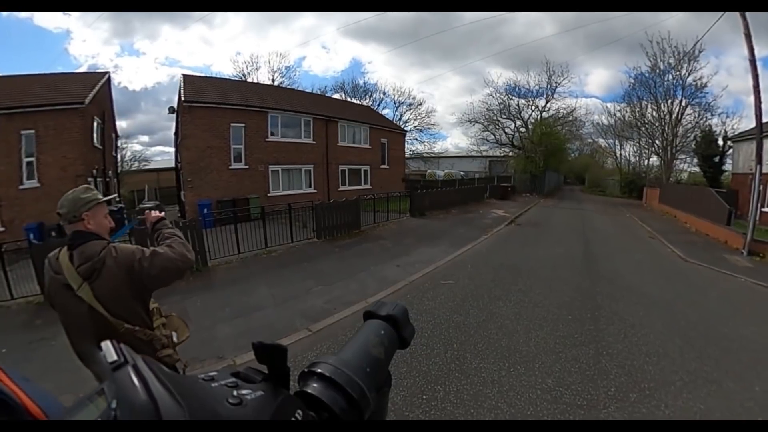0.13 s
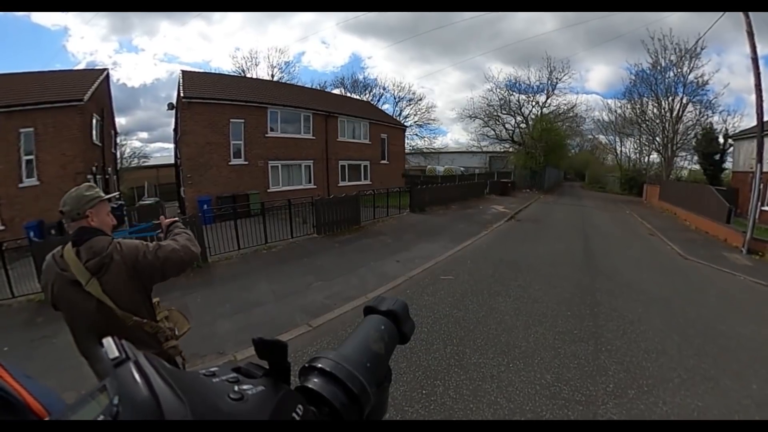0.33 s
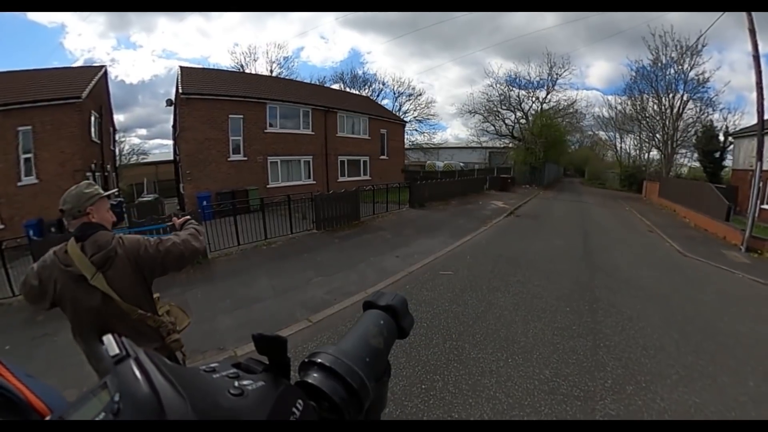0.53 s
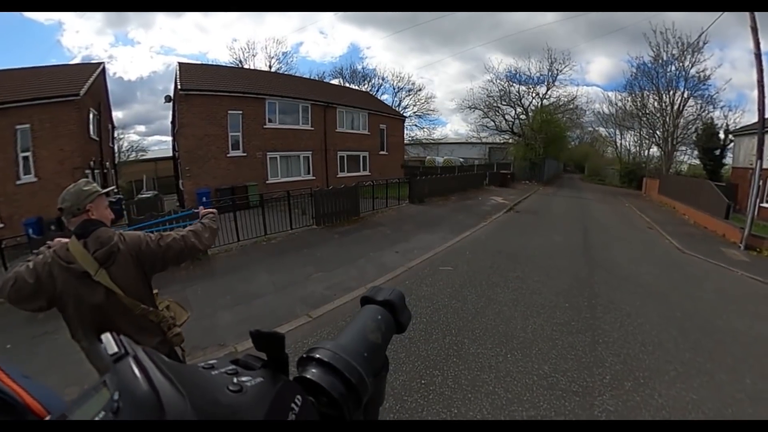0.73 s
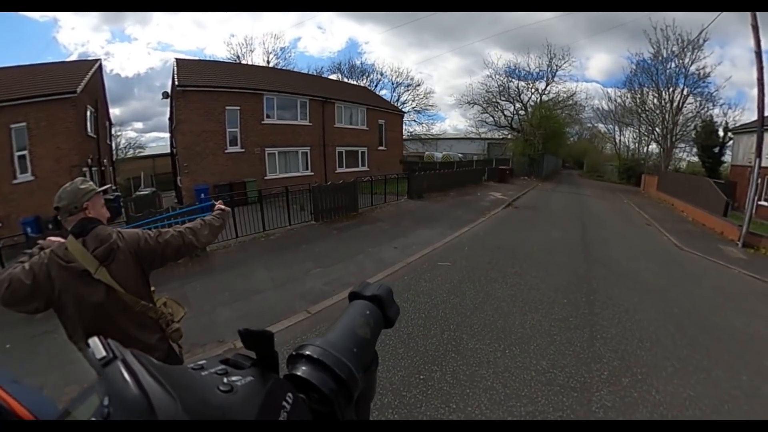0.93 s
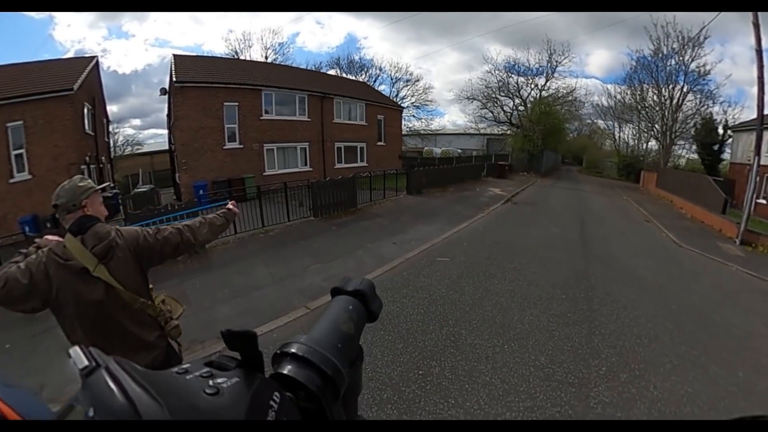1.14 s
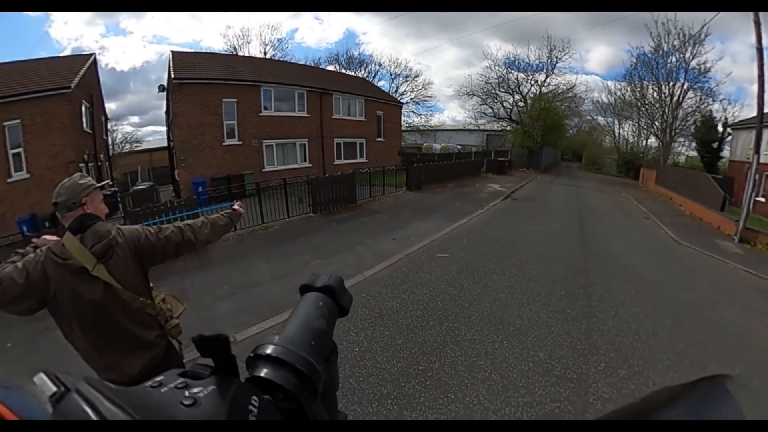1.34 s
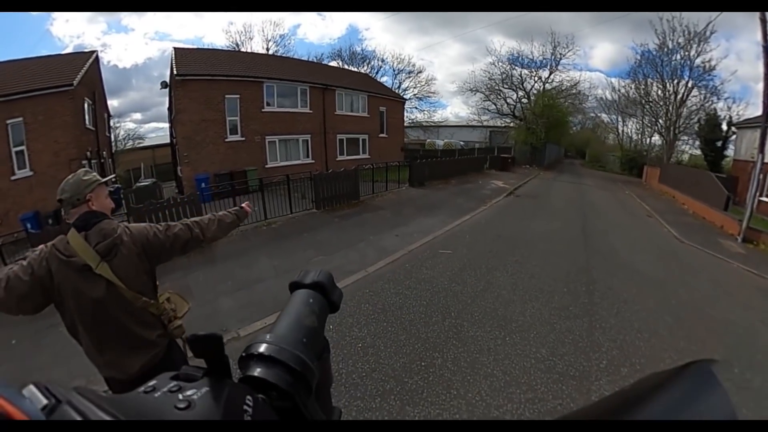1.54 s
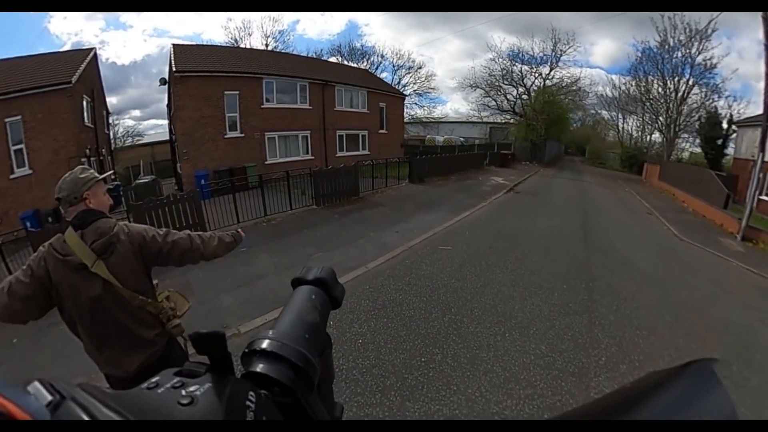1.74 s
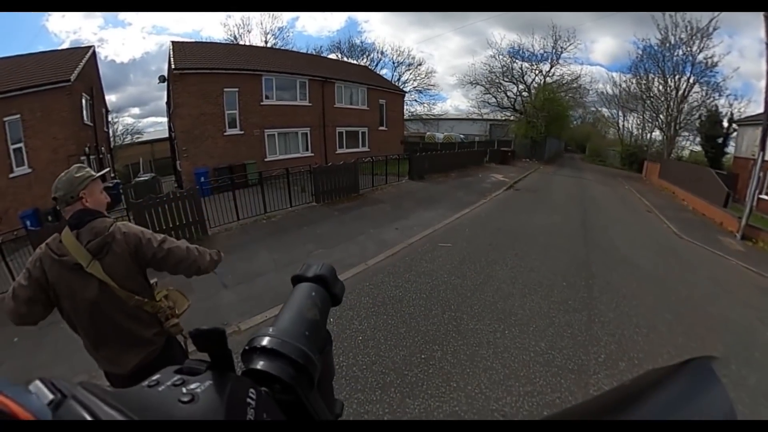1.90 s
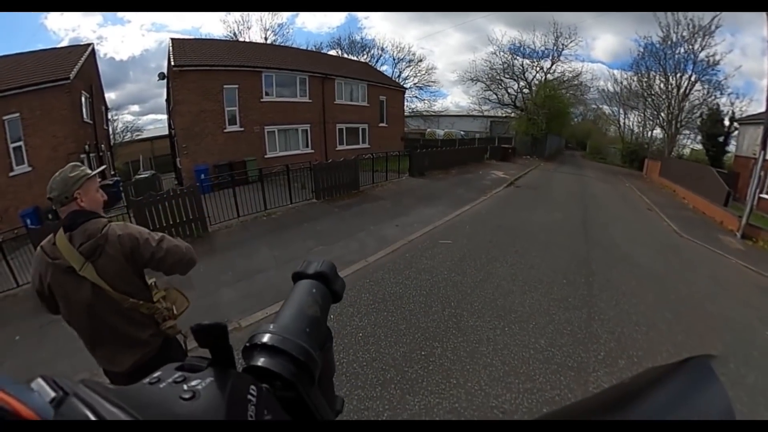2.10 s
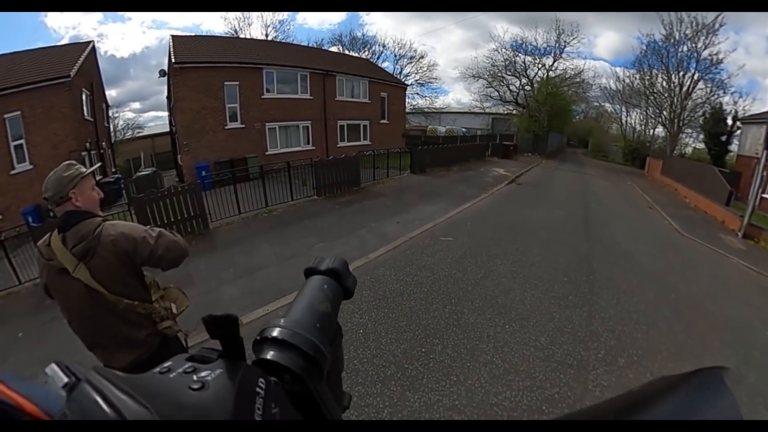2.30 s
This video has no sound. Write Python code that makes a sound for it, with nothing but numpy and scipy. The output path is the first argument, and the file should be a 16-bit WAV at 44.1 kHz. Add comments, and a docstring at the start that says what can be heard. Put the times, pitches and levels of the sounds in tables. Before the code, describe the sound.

A hand catapult snaps sharply on a quiet street, its pellet ripping leaves and clattering on metal.

```python
"""Distant traffic, an engine hum, gusting wind and faint hiss are shaped noise and a drifting sine.
Wind puffs push the microphone, and a drawn rubber band ticks once as a filtered impulse.
A hand catapult is shot: bands swish, crack, flap, thud and crack again; a quiet street echoes it.
A third of a second later the pellet rips through far leaves as noise bursts, then clatters on
ringing metal. A sleeve brushes last, as a narrow band of noise that rises in pitch."""
import sys
import numpy as np
from scipy import signal
from scipy.fft import rfft, irfft
from scipy.io import wavfile
from scipy.ndimage import uniform_filter1d

SR = 44100
rng = np.random.default_rng(int(sys.argv[2]) if len(sys.argv) > 2 else 0)


def bounce(signal):
    """Save signal as a 16-bit WAV file at the path given by the first command-line argument."""
    frames = np.transpose(np.atleast_2d(signal))
    limited = np.clip(frames, -1, 1)
    pcm = np.round(limited * 32767).astype(np.int16)
    wavfile.write(sys.argv[1], SR, pcm)


N = 108309
T = np.arange(N) / SR

# Every table named *_COLOUR is a relative spectrum: frequency_hz, level_db


def amp(db):
    """Decibel law: 20 dB is a tenfold gain."""
    return 10 ** (np.asarray(db) / 20)


def unit(x):
    """Energy normalisation: the squares sum to 1."""
    return x / np.sqrt(np.sum(x ** 2) + 1e-20)


def unit_rms(x):
    """Power normalisation: a signal of the scene's length gets rms 1."""
    return np.sqrt(N) * unit(x)


def read(points, hz):
    """Interpolation on a logarithmic frequency axis, as hearing spaces pitch."""
    f, value = np.transpose(points)
    return np.interp(np.log(hz + 1), np.log(f + 1), value)


def level(points):
    """Gain envelope, linear in decibels between points of time_s, level_db."""
    return amp(np.interp(T, *np.transpose(points)))


def convolve(x, response):
    """Linear superposition of delayed responses, cut to the length of the scene."""
    return signal.fftconvolve(x, response)[:N]


def colour(x, points, size=4096):
    """Minimum-phase filter of energy 1: the Hilbert transform of log gain gives a causal phase."""
    hz = abs(np.fft.fftfreq(size, 1 / SR))
    log_gain = np.log(amp(read(points, hz)))
    spectrum = np.exp(np.conj(signal.hilbert(log_gain)))
    response = np.fft.ifft(spectrum).real[:size // 2]
    return convolve(x, unit(response))


def noise(points):
    """Spectral shaping of white noise, giving steady noise of rms 1."""
    gain = amp(read(points, np.fft.rfftfreq(N, 1 / SR)))
    return unit_rms(irfft(rfft(rng.standard_normal(N)) * gain, N))


def grainy(depth_db, span=60):
    """Random amplitude modulation: a gain of rms 1 that flickers over about span samples."""
    flicker = unit_rms(uniform_filter1d(rng.standard_normal(N), span))
    return unit_rms(amp(depth_db * flicker))


def click(s):
    """Unit impulse: one sample holding all frequencies equally."""
    return 1. * (np.arange(N) == round(s * SR))


def burst(s, decay):
    """Exponential decay of noise from a sudden onset, with energy 1."""
    return unit(rng.standard_normal(N) * (T >= s) * np.exp(-abs(T - s) / decay))


def swells(rows):
    """Exponential growth to each peak and exponential decay after it."""
    return sum(amp(db) * np.exp(-np.maximum((s - T) / rise, (T - s) / fall))
               for s, db, rise, fall in rows)


def ring(s, hz, t60):
    """Damped resonance: a sine from s that falls 60 dB in t60 seconds."""
    t = np.maximum(T - s, 0)
    return np.sin(2 * np.pi * hz * t) * np.exp(-np.log(1000) * t / t60)


REBOUND, REBOUND_WIDTHS = 0.73, 2.48  # area and width of the rebound, relative to the dip


def pushes(rows):
    """Pressure displacement: Gaussian dips, each overlapped by a broader positive rebound."""
    total = 0
    for s, db, width in rows:
        dip = np.exp(-((T - s) / width) ** 2)
        rebound = np.exp(-((T - s) / width / REBOUND_WIDTHS) ** 2)
        total = total + amp(db) * (REBOUND / REBOUND_WIDTHS * rebound - dip)
    return total


# time for 60 dB of decay in the street: frequency_hz, t60_s
STREET_T60 = [(200, .4), (1500, 1), (4000, 0.64), (8000, 0.6), (14000, 0.41)]


def street(x, build_s=0.015):
    """Diffuse reverberation between the houses, each frequency band dying at its own speed."""
    hz, t, z = signal.stft(rng.standard_normal(SR), SR, nperseg=256)
    decay = amp(-60 * t / read(STREET_T60, hz)[:, None])
    tail = signal.istft(z * decay, SR)[1]
    build_up = np.minimum(T[:len(tail)] / build_s, 1)
    return convolve(x, unit(tail * build_up))


TRAFFIC_COLOUR = [(60, -2.5), (170, 4), (270, -4), (400, -10), (700, -10.5), (1050, -5), (1350, -10),
                  (1750, -11.5), (2400, -26), (3500, -36.5), (7000, -53), (10000, -51), (15000, -88)]
TRAFFIC_DB = -54.5


def traffic():
    """Incoherent sum of many distant sources, heard as steady noise."""
    return amp(TRAFFIC_DB) * noise(TRAFFIC_COLOUR)


# level of a far engine: time_s, rms_level_db
HUM = [(0, -67), (.42, -55.5), (.62, -53), (.95, -54.5), (1.12, -73), (2.45, -67.5)]
HUM_HZ, HUM_DRIFT_HZ = 102.8, 4.03  # centre pitch and rms drift


def engine_hum():
    """Frequency modulation: a far engine's sine drifts slowly and randomly in pitch."""
    drift = unit_rms(uniform_filter1d(rng.standard_normal(N), size=2000))
    phase = 2 * np.pi * np.cumsum(HUM_HZ + HUM_DRIFT_HZ * drift) / SR
    return np.sqrt(2) * level(HUM) * np.sin(phase)


WIND_COLOUR = [(3, -24.5), (14, -5), (25, 0.5), (42, -6), (65, -13.5), (110, -28), (200, -31.5), (400, -48),
               (1500, -98)]
# strength of the wind: time_s, level_db
GUSTS = [(0, -57), (.25, -50), (.45, -45.5), (.8, -47.5), (1.15, -49.5), (1.3, -37), (1.35, -45),
         (1.42, -35.5), (1.55, -38), (1.64, -47.5), (1.82, -48.5), (1.95, -46), (2.08, -48), (2.22, -52),
         (2.34, -42), (2.44, -33.5)]
# low flutter of the wind: peak_s, level_db, rise_s, fall_s
BUFFETS = [(1.29, -41.5, 0.014, 0.03), (1.41, -51.5, 0.015, 0.031), (2.33, -66, 0.039, 0.14)]
BUFFET_COLOUR = [(40, -4.5), (90, 0), (170, 5), (260, -13.5), (450, -42), (2000, -77)]


def wind():
    """Turbulent pressure on the microphone: low noise follows the gusts and flutters in buffets."""
    return level(GUSTS) * noise(WIND_COLOUR) + swells(BUFFETS) * noise(BUFFET_COLOUR)


# strength of the faint treble hiss: time_s, level_db
HISS = [(0, -81.5), (.18, -82.5), (.3, -76), (.45, -79), (.68, -76.5), (.82, -82.5), (.95, -72.5),
        (1.33, -73.5), (1.46, -80), (1.8, -76.5), (2.2, -74), (2.35, -75), (2.42, -70.5)]
HISS_COLOUR = [(1000, -0.5), (2800, -4), (4200, -7.5), (5300, 0), (7400, -3), (8100, -11.5), (9000, -11.5),
               (10500, -30), (15000, -58)]


def hiss():
    """Amplitude-modulated noise: a faint treble hiss rises and falls."""
    return level(HISS) * noise(HISS_COLOUR)


# puffs of wind: centre_s, dip_level_db (without rebound), half_width_s (to 1/e)
PUFFS = [(.474, -34, 0.0091), (.545, -36, .0035), (.697, -34, 0.0037), (.776, -41, 0.0029),
         (.932, -41, 0.0039), (1.065, -39, .008), (1.493, -19, 0.025), (1.534, -18, 0.0092),
         (1.914, -38.5, 0.0047), (1.972, -27, 0.0054), (2.076, -39, 0.0044)]


def puffs():
    """Quasi-static pressure: puffs of wind push the microphone."""
    return pushes(PUFFS)


# the drawn band ticks once: start_s, level_db (before TICK_GAIN_DB)
TICKS = [(0.6893, -44.5)]
TICK_COLOUR = [(300, -20), (1500, -3), (2700, 4), (5200, 0.5), (7000, -22), (12000, -37)]
TICK_GAIN_DB = 9.5


def tick():
    """Impulse excitation: the rubber settles as it is drawn."""
    return colour(sum(amp(db + TICK_GAIN_DB) * click(s) for s, db in TICKS), TICK_COLOUR)


# the bands rush through the air, out and back: fastest_s, level_db, rise_s, fall_s
SWISHES = [(1.540, -32.5, 0.0049, 0.01), (1.5595, -34.5, 0.0021, 0.0036), (1.568, -33, 0.0021, 0.0048)]
SWISH_COLOUR = [(100, -6), (290, 0), (450, -6), (850, 1.5), (1300, 2.5), (1800, 2.5), (2200, -2.5),
                (2900, -2.5), (4700, -10), (6000, -10), (8700, -9.5), (10500, -27.5), (15000, -36)]


def swishes():
    """Aerodynamic noise: the rush of air swells and fades around each band's fastest moment."""
    return swells(SWISHES) * noise(SWISH_COLOUR) * grainy(depth_db=1.5)


def whip(s, hz, db, width):
    """Wave packet: the tip of the band whips past in a zip of a few cycles."""
    return amp(db) * np.exp(-((T - s) / width) ** 2) * np.cos(2 * np.pi * hz * (T - s))


# whip cracks of bands and pouch, with the crack returned sharply off the ground at 1.5707 s: start_s, level_db
# (before halving), sizzle_decay_s, zip_pitch_hz, zip_peak_db, zip_half_width_s (to 1/e)
CRACKS = [(1.5372, -7.5, 0.0003, 7030, -16.5, 0.00016), (1.5466, -22.5, .0006, 8700, -33, 0.00037),
          (1.5643, -4.5, 0.0019, 6000, -19, 0.0003), (1.5654, -6.5, 0.0009, 3370, -23, 0.00062),
          (1.5707, -11, 0.0015, 7300, -33, 0.00032), (1.5866, -21, 0.0034, 7400, -45, .0015)]
CRACK_COLOUR = [(100, -31), (600, -29), (1500, 4.5), (2200, -7), (2600, 2.5), (3300, -1), (4200, -3),
                (5200, -10), (5550, 6.5), (6600, -11), (7500, 2), (8900, -7.5), (10300, -19.5),
                (15000, -37)]
SIZZLE_DB = -0.5  # sizzle relative to the click


def cracks():
    """Shock excitation: each crack is a coloured click and sizzle with a zip."""
    snaps = sum(amp(db) * (click(s) + amp(SIZZLE_DB) * burst(s, decay))
                for s, db, decay, *_ in CRACKS)
    zips = sum(whip(s, hz, db, width) for s, _, _, hz, db, width in CRACKS)
    return .5 * colour(snaps, CRACK_COLOUR) + zips


# slack rubber pushes the air: centre_s, dip_level_db (without rebound), half_width_s (to 1/e)
FLAPS = [(1.5391, -18, 0.00013), (1.5425, -24.5, 0.00078), (1.54625, -15, 0.00014), (1.5473, -15, 0.00013),
         (1.5500, -27.5, 0.00017), (1.5620, -23.5, 0.00032)]
# resonances the flaps excite: pitch_hz, level_db, t60_s
FLAP_RING = [(880, -49, 0.041), (1082, -38, 0.035), (1575, -36.5, 0.024), (1920, -39, .02)]


def flaps():
    """Volume displacement: slack rubber flaps push the air and excite damped resonances."""
    dips = pushes(FLAPS)
    resonances = sum(amp(db) * ring(0, hz, t60) for hz, db, t60 in FLAP_RING)
    return dips + convolve(dips, resonances)


# the fork and slack bands thud, out and back: start_s, level_db, pitch_hz, t60_s
THUDS = [(1.5397, -30.5, 260, 0.041), (1.5590, -27, 270, 0.026)]


def thuds():
    """Damped vibration: fork and slack bands ring briefly at a low pitch."""
    return sum(amp(db) * ring(s, hz, t60) for s, db, hz, t60 in THUDS)


def catapult():
    """Superposition of cracks, swishes, flaps and thuds."""
    return cracks() + swishes() + flaps() + thuds()


# echoes off the ground, fence and walls: delay_s, level_db, scatter_decay_s
NEAR_WALLS = [(0.037, -37, .009), (0.057, -28.5, 0.0024), (0.0622, -22, 0.0011), (0.133, -36, 0.002)]
STREET_COLOUR = [(200, 5), (450, 0), (1100, 1.5), (1900, 1), (2300, -1), (2900, -1), (3600, -1),
                 (4800, -2.5), (5700, -1.5), (7500, -3), (8900, -12), (10300, -18), (14000, -37)]
STREET_DB = -21.5


def echoes(shot):
    """Diffuse reflection: walls, fences and street return noise that follows the shot's power."""
    power = abs(uniform_filter1d(shot ** 2, size=80))
    scattered = np.sqrt(power) * rng.standard_normal(N)
    walls = sum(amp(db) * burst(s, scatter) for s, db, scatter in NEAR_WALLS)
    returned = convolve(scattered, walls) + amp(STREET_DB) * street(scattered)
    return colour(returned, STREET_COLOUR) * grainy(depth_db=2.0, span=200)


# the pellet slaps the first leaves: start_s, level_db (before halving), decay_s
SLAPS = [(1.8623, -24, 0.0031), (1.868, -23.5, 0.0054), (1.8703, -22.5, .004), (1.8762, -20.5, 0.0035),
         (1.8827, -26, 0.0033), (1.886, -22.5, 0.0053), (1.893, -21.5, .004), (1.9112, -26.5, .003)]
SLAP_COLOUR = [(300, -30), (1000, 7), (1500, 6), (2100, 7.5), (2700, -14), (4500, -12), (5500, -0.5),
               (7300, 0.5), (8900, -9), (10000, -17), (14500, -39)]
# spray of foliage: peak_s, level_db, rise_s, fall_s
SPRAYS = [(1.893, -48, 0.0068, 0.014), (1.912, -55.5, 0.0066, 0.025)]
SPRAY_COLOUR = [(300, -9), (900, 6), (1500, 6.5), (2300, -5.5), (2900, 3), (4000, -3.5), (5300, 2),
                (7500, -12), (9000, -12.5), (11000, -29), (14500, -50)]
LEAF_GRAIN_DB, LEAF_TAIL_DB = 2, -5  # flicker depth; reverberation level


def leaves():
    """Multiple impacts: papery slaps and a grainy spray as the pellet passes through foliage."""
    slaps = .5 * colour(sum(amp(db) * burst(s, decay) for s, db, decay in SLAPS), SLAP_COLOUR)
    rip = slaps + swells(SPRAYS) * noise(SPRAY_COLOUR) * grainy(LEAF_GRAIN_DB)
    return rip + amp(LEAF_TAIL_DB) * street(rip)


# the pellet strikes and rebounds: start_s, level_db (noise bursts are then halved), decay_s
HITS = [(2.018, -20.5, 0.0011), (2.0225, -12.5, 0.0021), (2.0338, -18.5, 0.0016), (2.0381, -13, 0.0016),
        (2.0412, -21.5, 0.0011), (2.0438, -24, .0015), (2.048, -23.5, .002), (2.064, -24, .0018),
        (2.085, -28, .002), (2.134, -31.5, .003), (2.14, -30, .0015)]
# clatter around the strikes: peak_s, level_db, rise_s, fall_s
CLATTER = [(2.04, -49, 0.013, 0.028), (2.091, -58, 0.0043, 0.015), (2.14, -60, 0.0031, 0.012)]
HIT_COLOUR = [(200, -19), (900, -2.5), (1650, 1), (2050, -3), (2450, 5), (3100, -2.5), (4150, 7),
              (5500, 0.5), (7300, -6), (8500, -17.5), (11000, -40), (15000, -63)]
# vibration modes of the metal: pitch_hz, level_db (relative to each hit), t60_s
HIT_MODES = [(1643, -39, .12), (2433, -47.5, 0.39), (4020, -52, 0.18), (4330, -53, .18)]
HIT_TAIL_DB = -10.5


def pellet():
    """Modal excitation: a distant clatter on metal that rings on, with the street's tail."""
    blows = sum(amp(db) * burst(s, decay) for s, db, decay in HITS) / 2
    clatter = swells(CLATTER) * rng.standard_normal(N) * grainy(depth_db=2.5)
    hit = colour(blows + clatter, HIT_COLOUR)
    modes = sum(amp(db) * ring(0, hz, t60) for hz, db, t60 in HIT_MODES)
    ringing = convolve(sum(amp(db) * click(s) for s, db, _ in HITS), modes)
    return hit + ringing + amp(HIT_TAIL_DB) * street(hit)


# a sleeve brushes: peak_s, level_db, rise_s, fall_s
RUSTLE = [(2.405, -71.5, 0.024, 0.03)]
RUSTLE_HZ, RUSTLE_WIDTH_HZ = 6750, 840  # centre pitch at the peak, and bandwidth
RUSTLE_RISE_HZ_PER_S = 21000


def sleeve():
    """Frictional noise: a soft, high brush of cloth rises in pitch as it speeds up."""
    since_peak = np.clip(T - RUSTLE[0][0], -.08, .05)  # the pitch holds outside these limits
    hz = RUSTLE_HZ + RUSTLE_RISE_HZ_PER_S * since_peak
    low_pass = signal.butter(2, RUSTLE_WIDTH_HZ / 2, fs=SR, output="sos")
    fuzz = signal.sosfilt(low_pass, rng.standard_normal(N))
    carrier = np.cos(2 * np.pi * np.cumsum(hz) / SR)
    return swells(RUSTLE) * unit_rms(fuzz * carrier)


# spectrum of the stereo difference: frequency_hz, level_db
SIDE_COLOUR = [(200, -15), (3000, -4), (9000, 7.0)]
WIDTH_DB = -23.5


def scene():
    """Mid-side stereo: nearly mono, with a trace of diffuse width on the shot."""
    shot = catapult()
    events = shot + echoes(shot) + leaves() + pellet() + tick() + sleeve()
    outdoors = engine_hum() + wind() + traffic() + hiss() + puffs()
    mid = events + outdoors
    side = amp(WIDTH_DB) * colour(convolve(shot, burst(0, 0.013)), SIDE_COLOUR)
    return np.array([mid + side, mid - side])


LOW_CUT_HZ, EDGE_HZ = 12, 15200  # lower and upper band limits


def record(dry):
    """Band limitation: a gentle high-pass, short fades at both ends and a steep low-pass."""
    high_pass = signal.butter(1, LOW_CUT_HZ, "high", fs=SR, output="sos")
    dry = signal.sosfilt(high_pass, dry)
    dry = dry * np.clip(np.minimum(T, T[-1] - T) / .004, 0, 1)
    low_pass = signal.firwin(255, EDGE_HZ, window=("kaiser", 8), fs=SR)
    return signal.oaconvolve(dry, low_pass[None], "same")


dry = scene()
out = record(dry)
bounce(out)
```